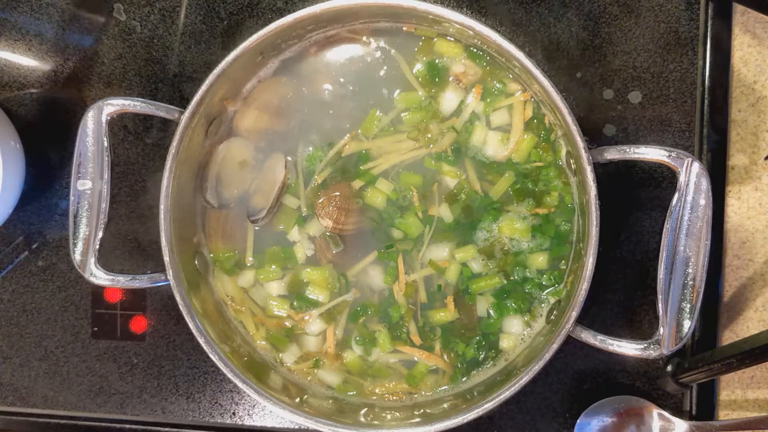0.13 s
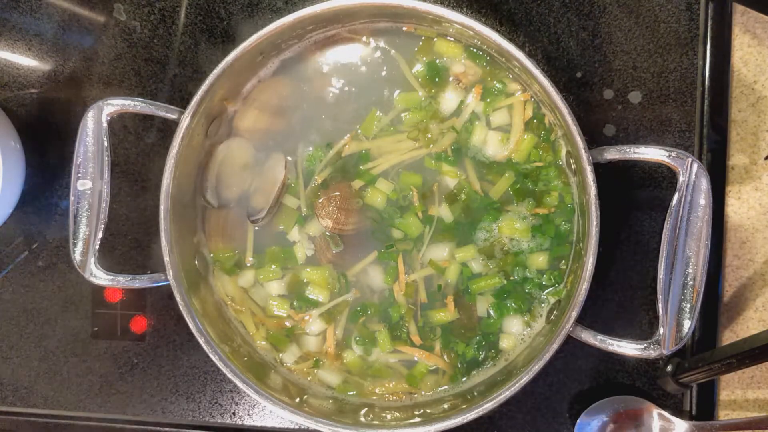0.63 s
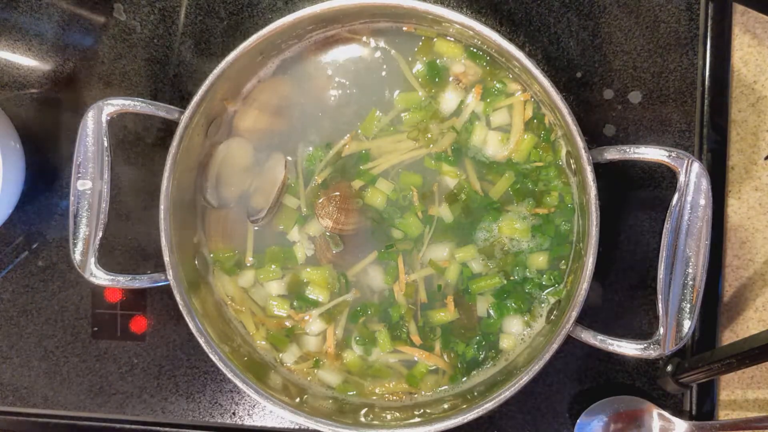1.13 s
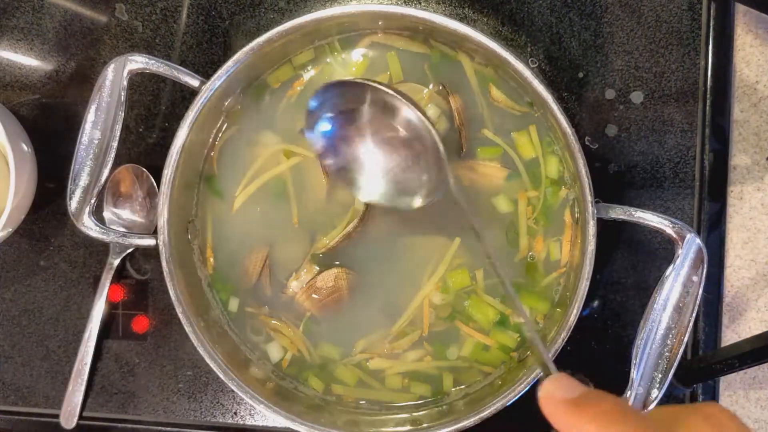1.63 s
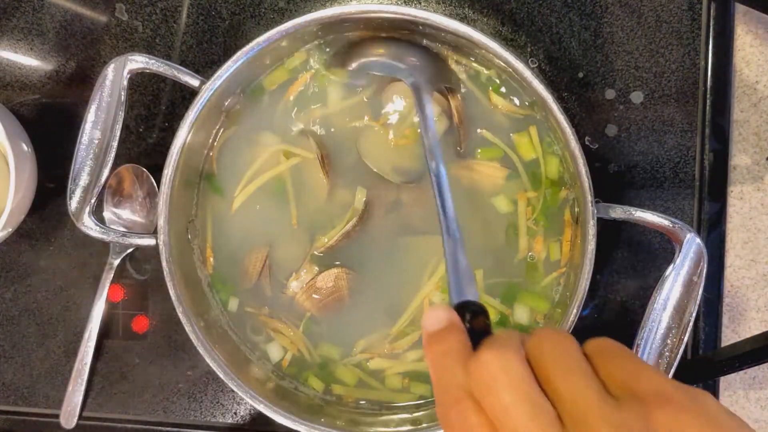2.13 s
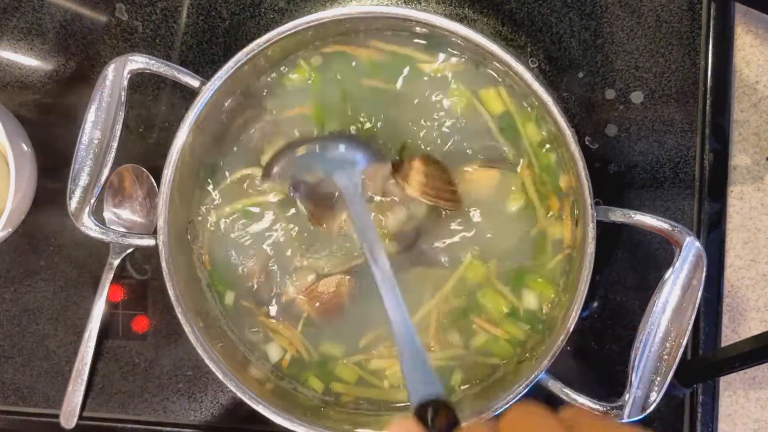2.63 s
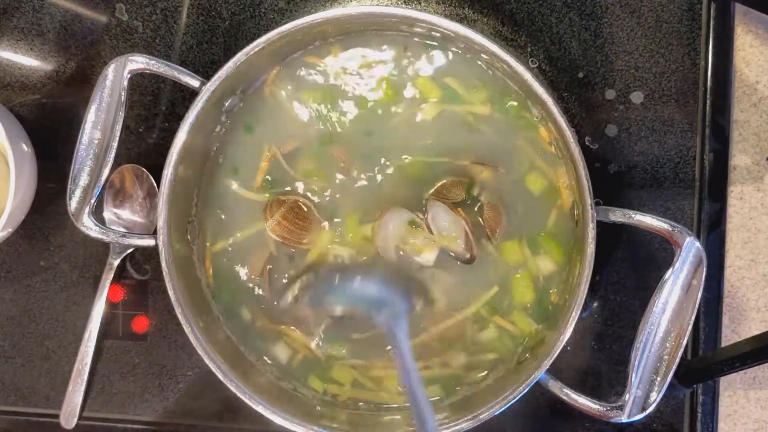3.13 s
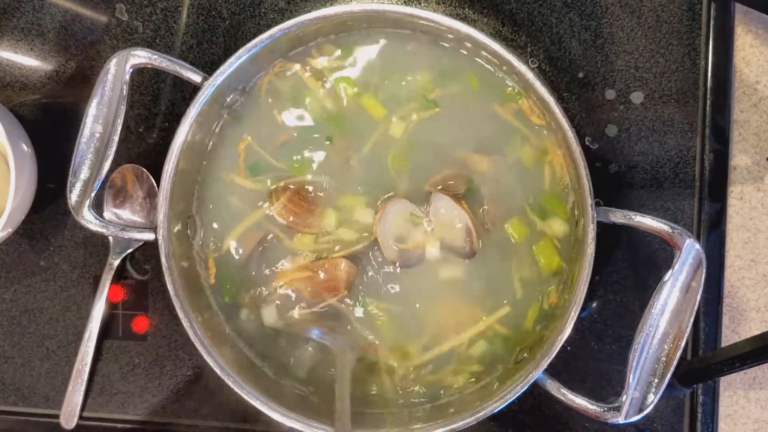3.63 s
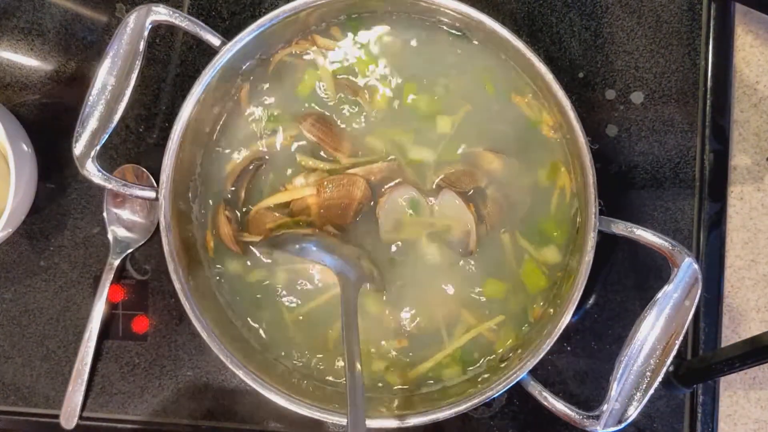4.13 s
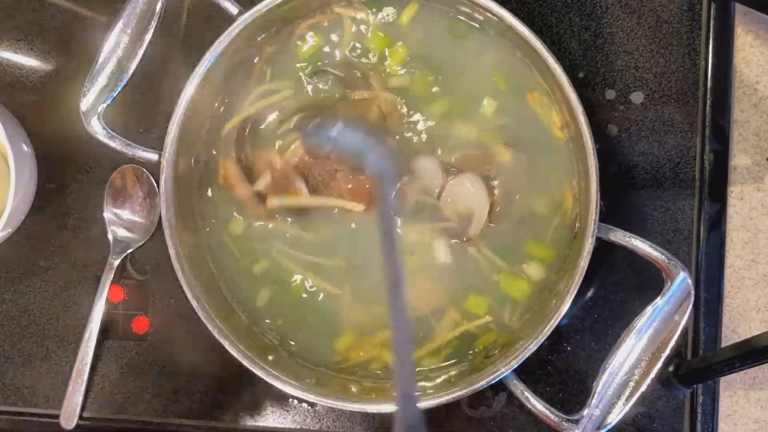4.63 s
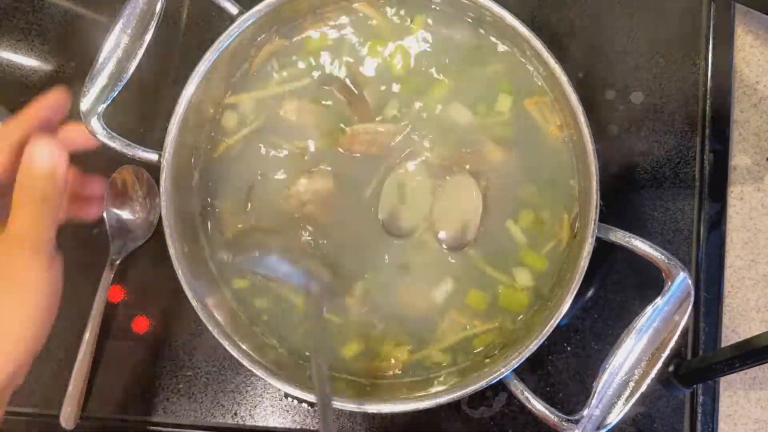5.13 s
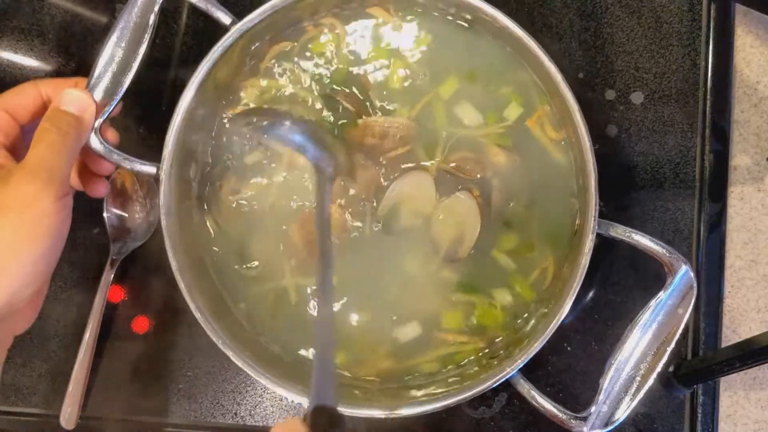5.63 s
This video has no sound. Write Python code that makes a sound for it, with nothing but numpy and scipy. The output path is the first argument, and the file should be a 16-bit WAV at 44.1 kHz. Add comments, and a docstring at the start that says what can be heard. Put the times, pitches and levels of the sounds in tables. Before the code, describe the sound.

A small home kitchen heard close above a steel pot of soup, in narrow-sounding stereo with little deep bass. A low, wavering fan hum sits in soft air rush with faint steady hiss. At about 0.6 s a heavy, dull knock hits the worktop, low and woody, with a short room tail; a weaker knock follows at 1.1 s. At 1.95 s a metal ladle strikes the pot loudly, bright but quickly damped by liquid, with another clank at 2.2 s. From 2.4 to 2.9 s it scrapes in gritty stick-slip bursts among shell clinks and quick watery bubbles. Small ringing ticks come near 3.0 s, then a strong clank at 3.4 s and a sharp knock at 3.5 s with brief scraping. Stirring is quieter until clustered clinks around 4.7-4.85 s, a light ping at 5.0 s, and more taps, scrape and gurgling from 5.2 to 5.75 s.

```python
"""A small kitchen, a phone close above a steel pot of soup with shells on a hob, heard through two ports.
A fan hums low from the start as a wavering tone in noise, with a rush of air and a faint hiss.
Dull knocks on the worktop, two of them plain, push on its modes; the room's tail fades after the first.
Then a metal ladle strikes the pot: modes of pot and ladle ring briefly, damped by the liquid, and notes of
shell, ladle and pot stand out. It drags in stick-slip clicks, shells clink at random, and the soup bubbles."""
import sys
import numpy as np
from scipy import signal
from scipy.io import wavfile
from scipy.ndimage import uniform_filter1d

SR = 44100
rng = np.random.default_rng(int(sys.argv[2]) if len(sys.argv) > 2 else 0)


def volts_from_db(level):
    """Convert decibel levels to linear amplitude ratios."""
    exponent = np.asarray(level, float) / 20
    return 10 ** exponent


def to_wav(s):
    """Save 16-bit WAV."""
    ch = np.atleast_2d(s).T  # columns
    pcm = np.round(np.clip(ch, -1, 1) * 32767)  # PCM
    wavfile.write(sys.argv[1], SR, pcm.astype(np.int16))


N = 254713
T = np.arange(N) / SR
BANDS = 45 * 2 ** np.arange(0, 8.6, .5)  # half-octave centres, Hz
BLOW = 1024  # samples that one blow may last
CHATTER = rng.standard_normal((260, BLOW))  # the rattle of each contact, one row a blow


def over(table, hz, axis=1):
    """Read one column of a (f/Hz, ..) table on a log-frequency axis."""
    columns = np.array(table)
    return np.interp(np.log(hz), np.log(columns[:, 0]), columns[:, axis])


def band(x, hz):
    """Half-octave band-pass; neighbours alternate in sign, so that they join without a gap."""
    edges = np.array([hz / 2 ** .25, hz * 2 ** .25])
    sign = (-1) ** round(2 * np.log2(hz / BANDS[0]))
    return sign * signal.sosfilt(signal.butter(2, edges, "band", fs=SR, output="sos"), x)


# likeness of left and right port in spread-out sound: [f/Hz, correlation -1 to 1]
PORT_LIKENESS = [(60, 0.75), (130, 0.95), (290, 0.88), (640, 0.52), (1410, 0.05), (3100, -0.22),
                 (6820, -0.0), (15000, 0.08)]


def pair(hz, noise):
    """Left and right from mid and side noise, as alike as the two ports are at this pitch."""
    alike = over(PORT_LIKENESS, hz)
    mid = np.sqrt(1 + alike) * noise[0]
    side = np.sqrt(1 - alike) * noise[1]
    return (mid + side * np.array([[1], [-1]])) / np.sqrt(2)


def ports(x):
    """A near source reaches the left port a few samples later than the right."""
    return np.array([np.roll(x, 6), x])


def walk(rate):
    """Random levels held 1 / rate s and slewed twice; spread 1."""
    hold = int(SR / rate)
    steps = np.repeat(rng.standard_normal(N // hold + 1), hold)
    x = uniform_filter1d(uniform_filter1d(steps, hold), hold)[:N]
    return x / np.std(x)


def colour(hz, pitch_hz, bass_db, treble_db, bump_db, octaves):
    """Where a contact lands sets what it excites: bass, treble and a favoured region."""
    bass = np.clip(np.log(700 / hz) / np.log(700 / 300), 0, 1)
    treble = np.clip(np.log(hz / 2500) / np.log(6000 / 2500), 0, 1)
    bump = np.exp(-(np.log2(hz / pitch_hz) / octaves) ** 2)
    return volts_from_db(bass * bass_db + treble * treble_db + bump * bump_db)


def place(s, sounds, size):
    """Add up the rows of sounds, each from its own moment in s."""
    samples = (s * SR).astype(int) + np.arange(size)
    return np.bincount(samples.ravel(), sounds.ravel(), N + size)[:N]


def blows(table, hz, rattle, ms, bump_db, octaves):
    """Each blow is one push and a short rattle after it; the rattle is too quick to reach the bass."""
    s, db, *spot = np.transpose(table)[:, :, None]
    t = np.arange(BLOW) / SR
    chatter = CHATTER[:len(table)] * np.exp(-t / (ms / 1000))
    chatter = chatter / np.sqrt(np.sum(chatter ** 2, axis=1, keepdims=True))
    push = rattle * min(hz / 2000, 1) * chatter
    push[:, 0] += min(2500 / hz, 1)  # the push lasts too long to reach the treble in full
    push *= volts_from_db(db) * colour(hz, *spot, bump_db, octaves)
    return place(s, push, BLOW)


def rings(force_at, modes):
    """Clear modes, each a damped resonator driven by the force at its pitch, each panned at random."""
    out = np.zeros((2, N))
    for (hz, db, t60), pan_db in zip(modes, 2 * rng.standard_normal(len(modes))):
        r, w = volts_from_db(-60 / (t60 * SR)), 2 * np.pi * hz / SR
        gain = volts_from_db(db) / 2
        ring = signal.lfilter([gain, 0, -gain], [1, -2 * r * np.cos(w), r * r], force_at(hz))
        out += ports(ring) * volts_from_db([[pan_db / 2], [-pan_db / 2]])
    return out


def fading(force, t60):
    """Envelope of the energy that a force leaves behind."""
    return np.sqrt(signal.lfilter([1], [1, -volts_from_db(-120 / (t60 * SR))], force ** 2))


def body(force_at, tail, tail_db, crack_db, early_db, early_s):
    """A crack, a quick dense shudder, and a longer fading tail that differs left and right."""
    noise, out = rng.standard_normal((2, N)), 0
    for hz in BANDS[4:]:
        force = force_at(hz)
        crack = volts_from_db(crack_db) * ports(force)
        shudder = volts_from_db(early_db) * fading(force, early_s)
        fade = volts_from_db(tail_db + over(tail, hz)) * fading(force, over(tail, hz, axis=2))
        out = out + band(crack + (shudder + fade) * pair(hz, noise), hz)
    return out


def notes(s, db, hz, t60, glide, size):
    """Lone fading tones; the pitch glides by this share of itself over one t60."""
    t = np.arange(size) / SR
    cycles = hz * t * (1 + glide * np.minimum(t / t60, 1) / 2)
    tone = volts_from_db(db - 60 * t / t60) * np.sin(2 * np.pi * cycles)
    tone *= np.minimum(t * hz / 1.05, 1)  # it builds over about its first cycle
    return ports(place(s, tone, size))


# hum, and air rush with the room's tail after the first knock, before random wavering:
# [t/s, hum level/dB, rush and tail level/dB]
KITCHEN_LEVELS = [(0.0, -61, -61), (0.5, -66, -61.5), (0.8, -67, -49.5), (1.0, -67, -57.5),
                  (1.22, -60, -53), (1.5, -55, -54), (1.9, -56.5, -59.5), (2.6, -61, -58.5),
                  (3.3, -62, -58.5), (3.7, -60.5, -56), (4.5, -58, -56.5), (5.2, -66, -64.5),
                  (5.5, -65, -62), (5.75, -53, -64)]
# spectrum of the rush of air and the room's tail: [f/Hz, relative level/dB]
RUSH_SPECTRUM = [(41, -31), (70, -5), (187, -13), (211, -19), (246, -17.5), (364, -19), (450, -11.5),
                 (539, -26.5), (708, -21.5), (1460, -25.5), (2600, -32), (3380, -64), (5720, -120)]
# spectrum of the hiss: [f/Hz, relative level/dB]
HISS_SPECTRUM = [(1530, -31), (2600, 6), (3800, -1), (6670, -4), (10900, -6), (13400, -11.5), (16000, -3.5)]


def kitchen():
    """A wavering fan hum, a rush of air and, after the first knock, the room's fading tail; a steady hiss."""
    s, hum_db, rush_db = np.transpose(KITCHEN_LEVELS)
    noise = rng.standard_normal((2, N))
    # one noise band serves for the rush and for the room's tail
    rush = sum(volts_from_db(over(RUSH_SPECTRUM, hz) + 0.67 * walk(3.6)) * band(pair(hz, noise), hz)
               for hz in BANDS[2:12])
    hiss = sum(volts_from_db(over(HISS_SPECTRUM, hz)) * band(pair(hz, noise), hz) for hz in BANDS[12:])
    fan_hz = 56  # mean pitch of the hum
    turns = np.cumsum(fan_hz * (1 + .07 * walk(8))) / SR
    tone = volts_from_db(2.0 * walk(17)) * np.sin(2 * np.pi * turns)
    hum = tone + 15 * band(pair(fan_hz, noise), fan_hz)
    hum_db = np.interp(T, s, hum_db) + 1.2 * walk(5)
    rush_db = np.interp(T, s, rush_db) + 2.1 * walk(4.94)
    layers = (hum, hum_db), (rush, rush_db), (hiss, -69)
    return sum(volts_from_db(db) * x / np.std(x) for x, db in layers)


# knocks on the worktop: [t/s, relative level/dB, favoured f/Hz, bass/dB, treble/dB]
WORKTOP_KNOCKS = [(0.623, -7.5, 355, -17.5, -23.5), (0.934, -41, 640, -27, -22.5),
                  (1.085, -18, 484, -19, -22.5)]
# clear modes of the worktop: [f/Hz, relative level/dB, t60/s]
WORKTOP_MODES = [(130.1, 6.5, 0.29), (163.8, 10.5, 0.13), (234, 5.5, 0.1), (293.3, 3, 0.17),
                 (396, -2.5, 0.17), (484, 12.5, 0.019), (517, -15, 0.27), (740, -22.5, 0.14),
                 (840, -37.5, 0.24), (1175, 3.5, 0.033), (1620, -18, 0.049), (2050, -13, 0.17),
                 (2230, -35, .18), (2500, -17, 0.16), (3440, -25.5, .15), (4800, -20.5, .1),
                 (6940, -26, .12), (9570, -33, .15)]
# its dense overtones and close reflections: [f/Hz, relative level/dB, t60/s]
WORKTOP_DENSE = [(152, 2.5, 0.33), (399, 7, 0.16), (1000, -8.5, 0.26), (2490, -19.5, 0.29),
                 (5600, -5.5, 0.21), (14000, -10.5, 0.19)]


def worktop():
    """Dull knocks on the worktop, whose slow bending waves bring the lowest modes late."""
    def late_knocks(hz):
        """The knocks as they reach the mode at this pitch."""
        late = int(SR * .014 * (130.2 / hz) ** 2)  # 14 ms at 130.2 Hz
        return np.roll(blows(WORKTOP_KNOCKS, hz, rattle=0.35, ms=8.9, bump_db=5, octaves=0.32), late)

    def knocks(hz):
        """The knocks as they shake the dense overtones."""
        return blows(WORKTOP_KNOCKS, hz, rattle=1.46, ms=5.5, bump_db=8.5, octaves=0.32)
    clear = rings(late_knocks, WORKTOP_MODES)
    dense = body(knocks, WORKTOP_DENSE, tail_db=1.5, crack_db=20, early_db=-9.5, early_s=0.021)
    return volts_from_db(-5.5) * clear + dense


# clear modes of the pot in its liquid: [f/Hz, relative level/dB, t60/s]
POT_MODES = [(110.4, -19, 0.48), (135, -15, 0.6), (237, -13.5, 0.43), (353.4, -12, 0.094),
             (528.8, -14.5, 0.16), (805, -18.5, 0.2), (870, -26.5, 0.55), (1208, -11, 0.073),
             (1550, -12, 0.12), (1680, -35, 0.02), (2010, -17, 0.13), (2230, -11.5, 0.052),
             (2520, -13, 0.18), (2740, -12.5, 0.19), (3000, -3, .05), (3415, -31, .06), (3970, -4, .06),
             (4530, -3, .05), (4670, -6, 0.068), (5400, -7, .04), (6500, -0.5, 0.057), (6760, -21, 0.0413),
             (8150, -8.5, 0.023), (9400, -11, 0.045), (11300, -2, .04), (13400, -20, .08),
             (14800, -12, .04)]
# its dense overtones and close reflections: [f/Hz, relative level/dB, t60/s]
POT_DENSE = [(143, -1.5, 0.49), (413, -3, 0.28), (1000, -5, 0.2), (2320, -11.5, 0.3), (6400, 0.5, 0.16),
             (15000, -11.5, 0.16)]


def pot(clinks):
    """Blows on pot and shells, and the drag between them, shake the pot's modes and dense overtones."""
    drag = dragging()

    def on_modes(hz):
        """Blows and drag as they reach one clear mode."""
        struck = blows(clinks, hz, rattle=0.16, ms=2.8, bump_db=12.5, octaves=0.062)
        return struck + volts_from_db(1.5) * drag(hz, bump_db=4, octaves=0.2)

    def on_body(hz):
        """Blows and drag as they shake the dense overtones."""
        struck = blows(clinks, hz, rattle=1.167, ms=1.56, bump_db=5.0, octaves=0.31)
        return struck + volts_from_db(-3.5) * drag(hz, bump_db=5, octaves=0.78)
    clear = rings(on_modes, POT_MODES)
    dense = body(on_body, POT_DENSE, tail_db=-9.5, crack_db=10.0, early_db=-8, early_s=0.027)
    return volts_from_db(-13) * clear + dense


# ladle on pot and shells: [t/s, relative level/dB, favoured f/Hz, bass/dB, treble/dB]
LADLE_BLOWS = [(1.947, -9, 2620, -7, -10), (2.022, -21.5, 912, -0.5, -10.5), (2.195, -20, 7200, -42, -3),
               (2.207, -11.5, 2230, -8.5, -19.5), (2.161, -52.5, 2500, -21, -5),
               (2.269, -38, 814, -10, -13), (2.318, -40, 1230, -4, -23), (2.397, -34.5, 870, 6, -18),
               (2.45, -28.5, 850, 0, -22), (2.488, -28, 1970, -22, -15.5), (2.636, -33.5, 1140, -10, -19.5),
               (2.689, -22.5, 1930, -17, -22), (2.716, -22.5, 1540, -29, -24),
               (2.731, -27.5, 1550, -4, -17.5), (2.743, -30, 1570, -21, -19.5),
               (2.827, -26.5, 2010, -27, -8), (2.839, -27.5, 2980, -8, -10.5), (2.929, -38.5, 1620, -19, 0),
               (2.939, -29, 6760, -30, -8), (3.015, -37, 3000, -13, 4.5), (3.021, -35, 3000, -0.5, 0.5),
               (3.379, -11.5, 897, 1, -4), (3.476, -17, 1710, -6, -11.5), (3.493, -26, 1630, 0.5, -25),
               (3.625, -29.5, 1470, -18, -15), (3.642, -36, 1480, -23, -35),
               (3.652, -48.5, 2190, -20, -2.5), (3.7, -46.5, 6100, -18, -12.5),
               (3.798, -39, 1050, 1.5, -35), (3.931, -41, 864, 1, -15), (3.97, -38, 840, -7, -13.5),
               (4.1, -36.5, 2500, -15, -49), (4.182, -39, 2280, -6, -30), (4.345, -38, 2010, 2.5, -18),
               (4.528, -38.5, 1330, 6, -29), (4.571, -30.5, 2300, -2, -31), (4.698, -31.5, 1920, -3.5, -17),
               (4.707, -24, 2640, -19, -11), (4.719, -29.5, 4040, -13, 0), (4.75, -28.5, 2700, -18, -0.5),
               (4.759, -20.5, 1950, -20, -3), (4.818, -29.5, 1530, -11, -9.5),
               (4.842, -26, 2440, -26.5, -7.5), (4.92, -29, 2520, -23, -12.5),
               (5.007, -36.5, 3970, -26, -17), (5.143, -49, 1100, -20, -14), (5.168, -46.5, 1000, -20, -21),
               (5.184, -51.5, 1100, -20, -11), (5.238, -21.5, 6770, -52, -4.5), (5.26, -33, 896, -31, -12),
               (5.319, -25.5, 805, 5.5, -0.5), (5.329, -22, 843, -13.5, -35.5), (5.499, -37, 804, 5, -3),
               (5.563, -26, 2230, -13, -3), (5.575, -20.5, 1960, -12.5, -16.5), (5.596, -22, 1420, -6, -20),
               (5.627, -23.5, 2080, -4, -12), (5.671, -26.5, 13300, -36, -5.5),
               (5.698, -28, 2060, -23, -10.5)]
# clear modes of the ladle's bowl: [f/Hz, relative level/dB, t60/s]
LADLE_MODES = [(2824, -6, 0.087), (6770, -14.5, 0.13), (6894, -1, .08), (6810, 2.5, 0.066)]


def ladle():
    """The thin bowl of the ladle rings with every blow, most with the bright ones."""
    def struck(hz):
        """The blows as the bowl feels them."""
        return blows(LADLE_BLOWS, hz, rattle=0.37, ms=1.5, bump_db=5.5, octaves=0.36)
    return volts_from_db(-11) * rings(struck, LADLE_MODES)


# notes of shell, ladle and pot floor that stand out of a blow:
# [t/s, level/dB, f/Hz, t60/s, glide as share of f]
LONE_NOTES = [(1.947, -34, 237, 0.41, -.05), (1.948, -32.5, 880, 0.24, 0),
              (1.947, -22.5, 7890, 0.023, -0.036), (2.195, -30, 11600, .03, 0),
              (3.377, -18.5, 8360, 0.033, -0.12), (3.379, -20, 9540, 0.032, -0.079),
              (4.921, -47.5, 6730, 0.068, 0), (2.208, -16, 2640, 0.031, 0), (2.488, -29.5, 2050, 0.032, 0),
              (2.93, -47, 7200, 0.1, 0.033), (2.929, -44, 1573, 0.18, 0), (3.021, -29, 2530, 0.048, 0),
              (3.02, -37, 4500, 0.069, 0), (2.94, -30.5, 3020, 0.12, -.02), (3.021, -22, 3050, 0.052, -.01),
              (3.021, -45, 3040, 0.26, 0), (3.021, -34.5, 7070, 0.073, 0), (3.021, -42, 6730, .19, 0),
              (3.38, -23, 237, 0.28, -.01), (3.476, -15.5, 1710, 0.03, 0), (3.476, -24.5, 6460, 0.027, 0),
              (4.761, -26.5, 1940, 0.062, -.1), (4.843, -49, 6700, 0.18, 0),
              (5.006, -26, 4050, 0.078, -0.044), (5.007, -42.5, 4110, 0.29, -0.11),
              (5.008, -40, 3950, .3, -.05), (5.009, -46, 3900, .25, 0.13), (5.328, -31, 1000, 0.082, -.35),
              (5.333, -37, 498, 0.039, -.4), (5.33, -48.5, 135, 1, 0)]


def shells(clinks):
    """Each blow sounds a short note at its favoured pitch; further notes of shell, ladle and pot floor
    stand out, some brief, some ringing on."""
    s, db, hz = np.transpose(clinks)[:3, :, None]
    short = notes(s, db - 9, hz, t60=60 / hz, glide=0.038, size=4000)  # fades 60 dB in 60 cycles
    return short + notes(*np.transpose(LONE_NOTES)[:, :, None], size=12000)


# ladle and shells dragged over the steel: [t/s, relative level/dB, favoured f/Hz, treble/dB]
DRAG_PATH = [(2.1, -72, 1220, 2), (2.33, -55.5, 1000, -20), (2.47, -46.5, 1000, -18),
             (2.56, -44, 1370, -13.5), (2.62, -51.5, 1140, -18), (2.66, -35.5, 1680, -20.5),
             (2.81, -34.5, 1520, -16), (2.9, -58, 1520, -9.5), (3.06, -55.5, 2470, -7),
             (3.12, -75, 1000, -4), (3.34, -76, 1000, -15), (3.43, -45, 1306, -1.5), (3.6, -39, 967, -11.5),
             (3.69, -60.5, 1000, -24), (3.9, -49.5, 887, -24), (4.07, -62, 1360, -28),
             (4.22, -56, 1205, -31), (4.44, -79, 1110, -18), (4.55, -49.5, 1520, -24),
             (4.66, -48, 1200, -13), (4.75, -39.5, 2020, -19), (4.94, -61, 1830, -19),
             (5.07, -72, 1040, -25), (5.16, -62.5, 994, -22), (5.23, -67.5, 1510, -28),
             (5.31, -47.5, 880, -9), (5.49, -54.5, 885, -12), (5.562, -35, 1680, -8.5),
             (5.77, -54, 2440, -4.5)]
DRAG_BASS_DB = -9


def dragging():
    """The ladle's rim sticks and slips in uneven clicks over a rub; returns its force by pitch."""
    s, *columns = np.transpose(DRAG_PATH)
    drag_db, pitch_hz, treble_db = (np.interp(T[::64], s, c) for c in columns)
    slips = (rng.random(N) < 300 / SR) * rng.standard_normal(N)  # about 300 a second
    slips = slips * volts_from_db(0.55 * rng.exponential(size=N))
    rub = 0.048 * rng.standard_normal(N) * volts_from_db(6.2 * walk(40))
    jerks = volts_from_db(5 * walk(16))  # the hand's unevenness
    contact = (slips + rub) * (T > s[0]) * jerks

    def drag(hz, bump_db, octaves):
        """The drag, as it excites this pitch."""
        gain = volts_from_db(drag_db) * colour(hz, pitch_hz, DRAG_BASS_DB, treble_db, bump_db, octaves)
        return contact * np.repeat(gain, 64)[:N]
    return drag


def jostle(count):
    """Shells pushed about clink at random, with the drag's level and near its pitch; rows like LADLE_BLOWS."""
    s, drag_db, pitch_hz, treble_db = np.transpose(DRAG_PATH)
    when = s[0] + rng.random(count) * (s[-1] - s[0])
    octaves = 0.53 * rng.standard_normal(count)
    level_db = np.interp(when, s, drag_db) + 2.5
    hz = np.interp(when, s, pitch_hz) * 2 ** octaves
    return np.transpose([when, level_db, hz, np.full(count, DRAG_BASS_DB), np.interp(when, s, treble_db)])


def bubbles(count, db, cycles, glide):
    """Rising notes of bubbles at random moments, their level following the drag and near its pitch."""
    s, drag_db, pitch_hz = np.transpose(DRAG_PATH)[:3]
    when, spread, strength = rng.random((count, 3)).T[:, :, None]
    when = s[0] + when * (s[-1] - s[0])
    hz = np.interp(when, s, pitch_hz) * 2 ** (1.88 * (spread - .5))
    level_db = np.interp(when, s, drag_db) + db + 8 * strength
    return notes(when, level_db, hz, cycles / hz, glide, size=1600)


def soup():
    """Stirred liquid rushes in many short bubbles and gurgles in a few longer ones."""
    rush = bubbles(count=2000, db=-5, cycles=10.8, glide=.15)
    gurgle = bubbles(count=160, db=-2.0, cycles=45, glide=0.28)
    return rush + gurgle


def scene():
    """Kitchen, worktop, pot, ladle, shells and soup together."""
    clinks = np.vstack([LADLE_BLOWS, jostle(count=150)])
    return kitchen() + worktop() + pot(clinks) + ladle() + shells(clinks) + soup()


def roll_off(x):
    """The treble ends steeply here."""
    return signal.sosfilt(signal.butter(12, 16880, fs=SR, output="sos"), x)


def record(dry):
    """The phone cuts the deepest bass and the very top, and its port has a dip in the treble."""
    x = signal.sosfilt(signal.butter(5, 46, "high", fs=SR, output="sos"), dry)
    x = x - .65 * signal.lfilter(*signal.iirpeak(10900, 9, fs=SR), x)
    x = signal.sosfilt(signal.ellip(6, .3, 30, 15900, fs=SR, output="sos"), x)
    x = np.tanh(1.2 * x) / 1.2  # the loudest peaks are rounded off
    return roll_off(x)


dry = scene()
out = record(dry)
to_wav(out)
```